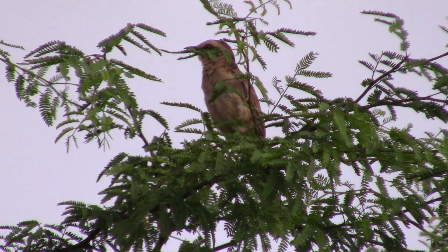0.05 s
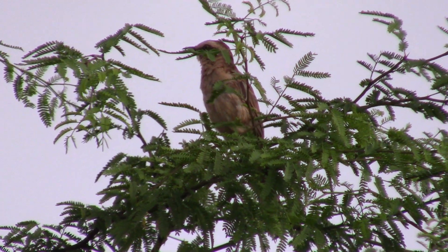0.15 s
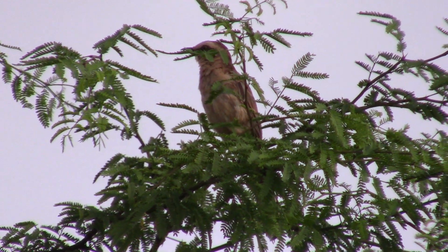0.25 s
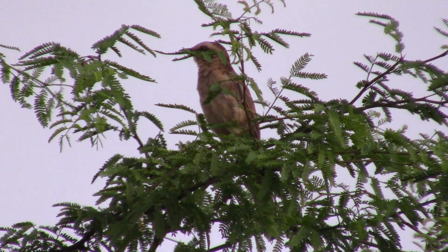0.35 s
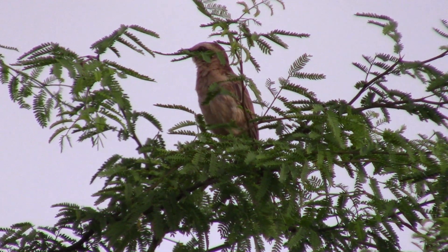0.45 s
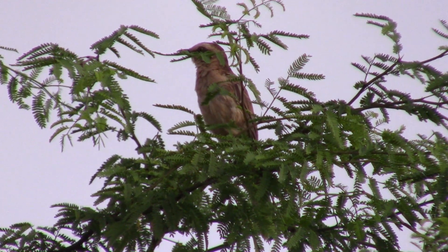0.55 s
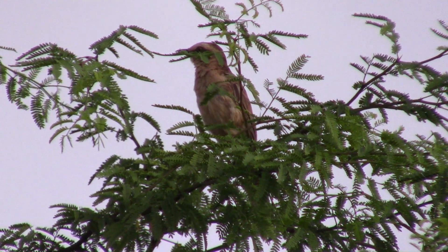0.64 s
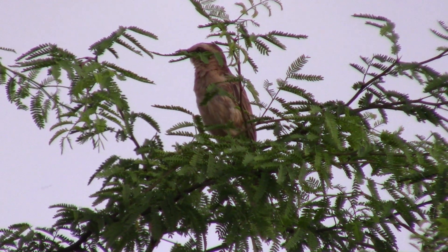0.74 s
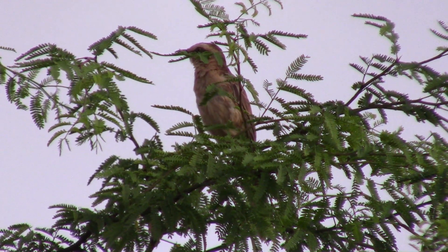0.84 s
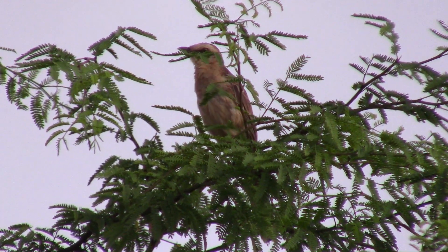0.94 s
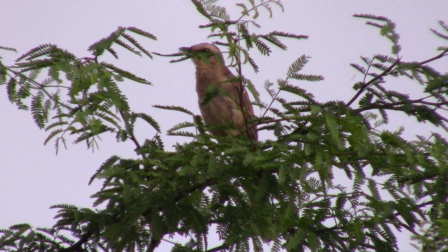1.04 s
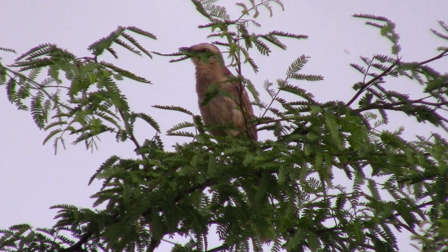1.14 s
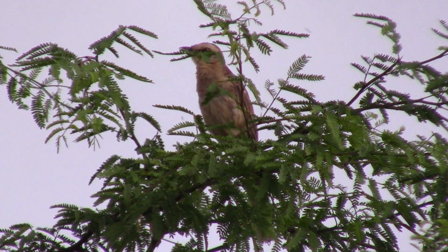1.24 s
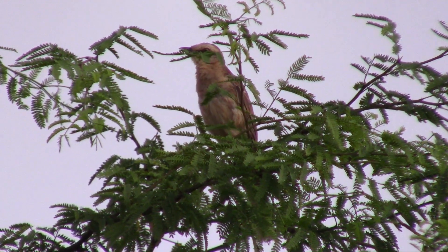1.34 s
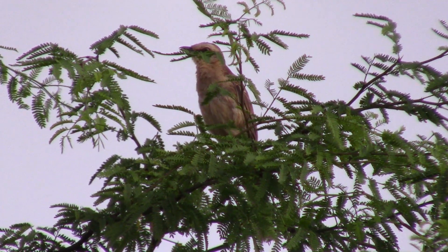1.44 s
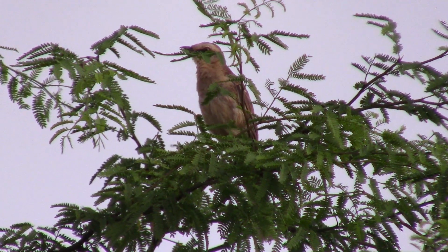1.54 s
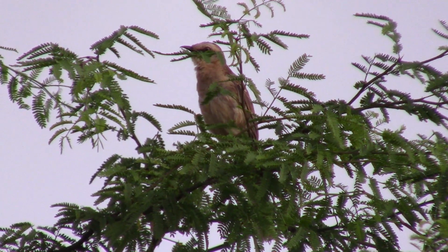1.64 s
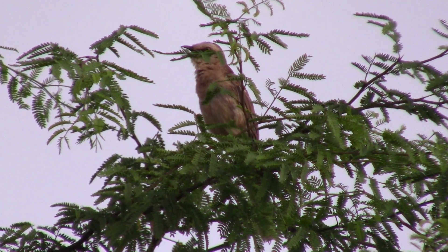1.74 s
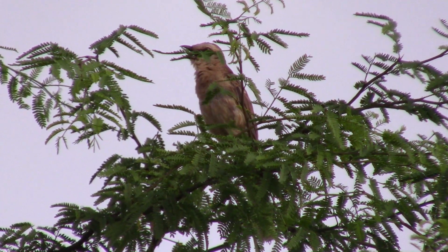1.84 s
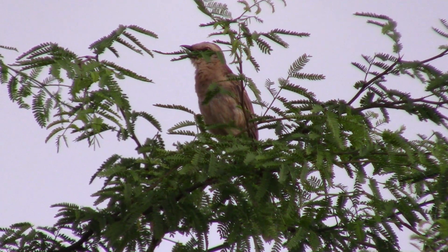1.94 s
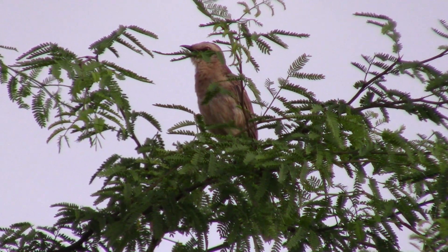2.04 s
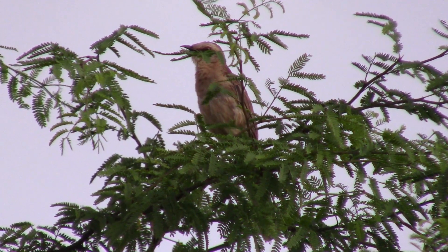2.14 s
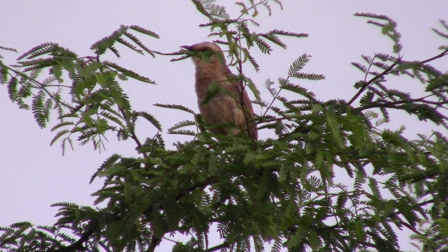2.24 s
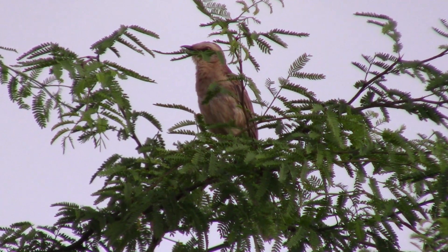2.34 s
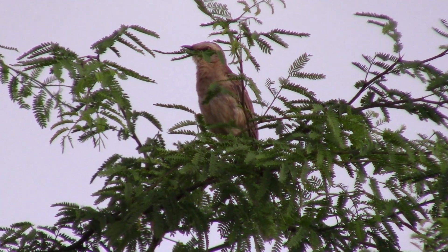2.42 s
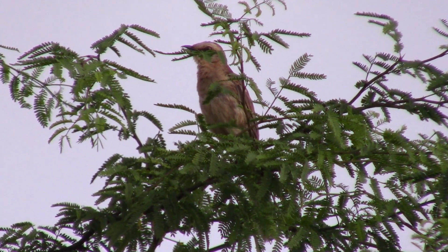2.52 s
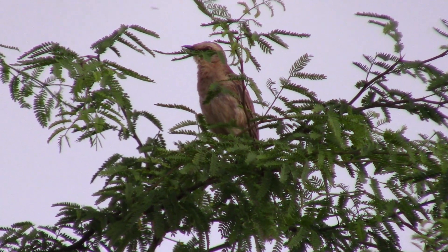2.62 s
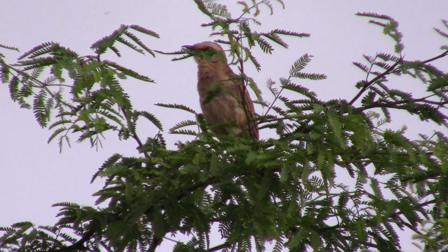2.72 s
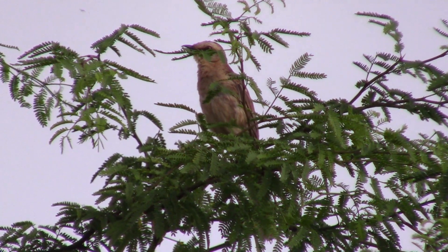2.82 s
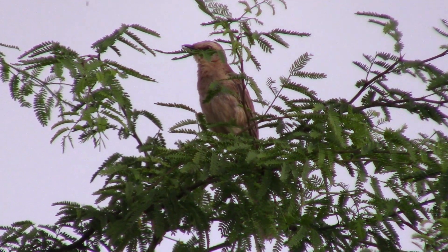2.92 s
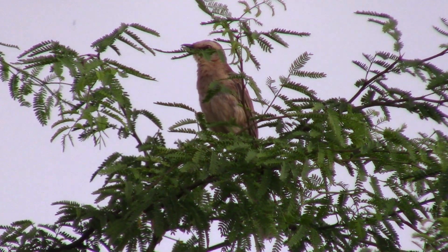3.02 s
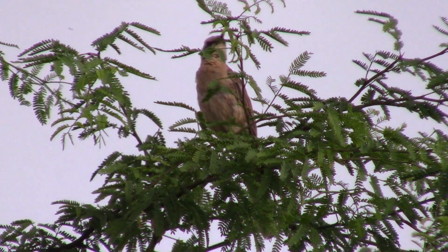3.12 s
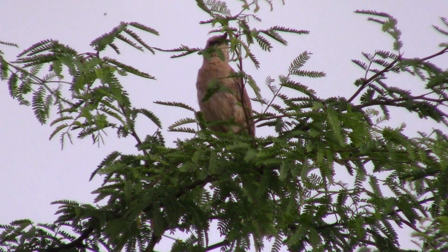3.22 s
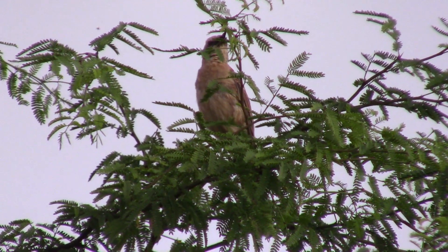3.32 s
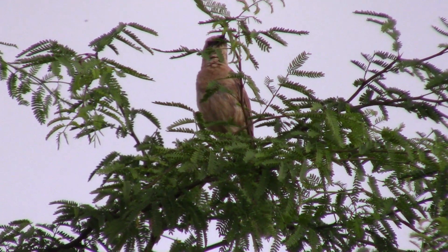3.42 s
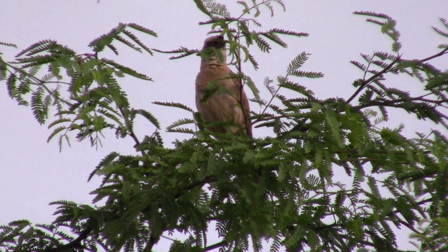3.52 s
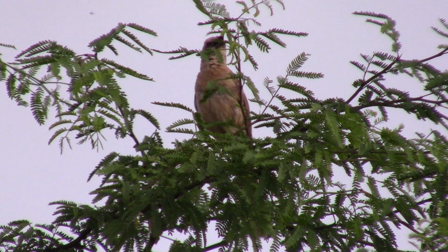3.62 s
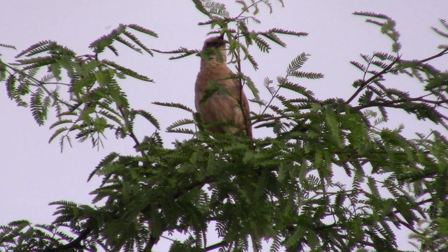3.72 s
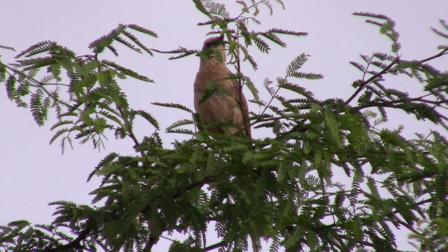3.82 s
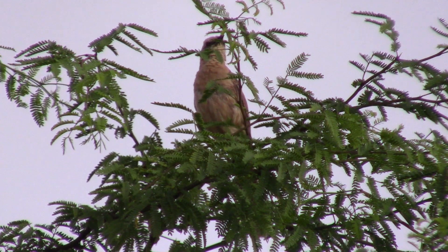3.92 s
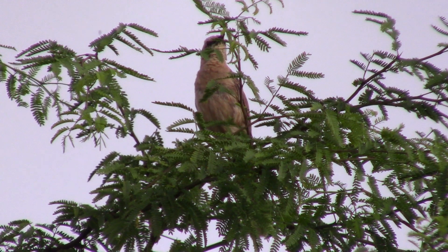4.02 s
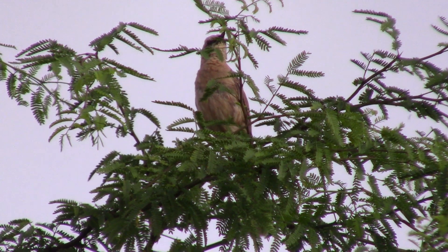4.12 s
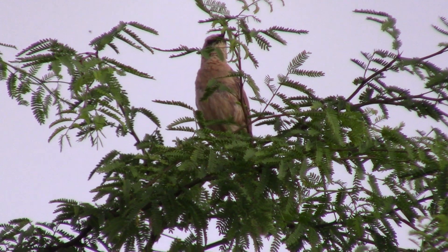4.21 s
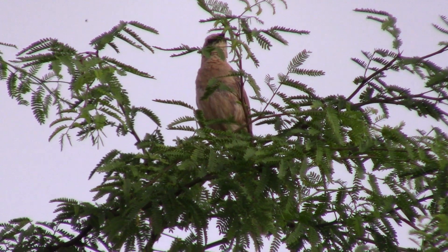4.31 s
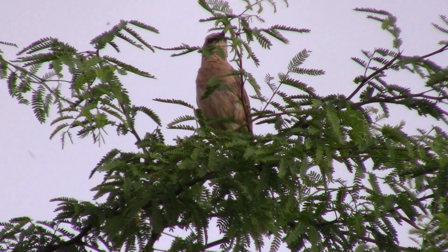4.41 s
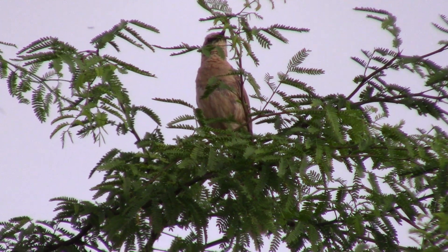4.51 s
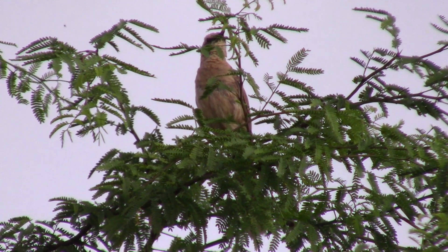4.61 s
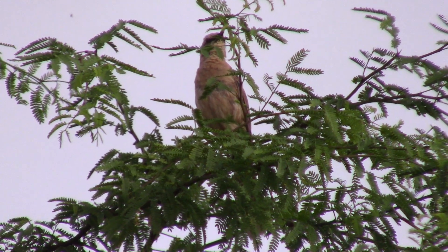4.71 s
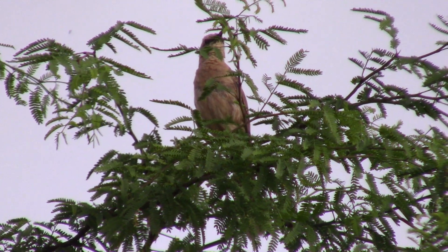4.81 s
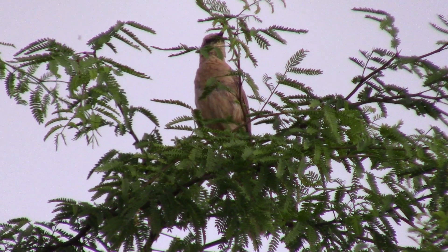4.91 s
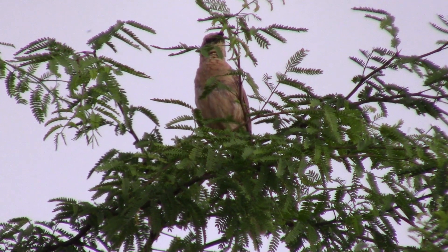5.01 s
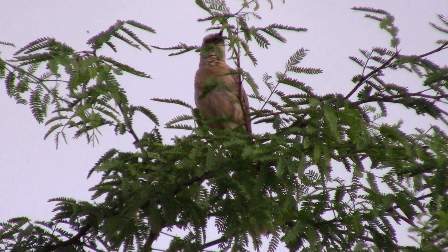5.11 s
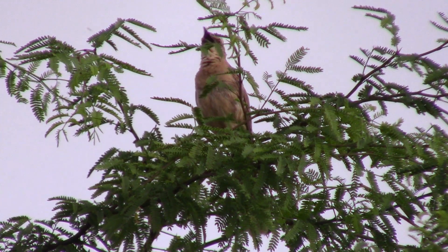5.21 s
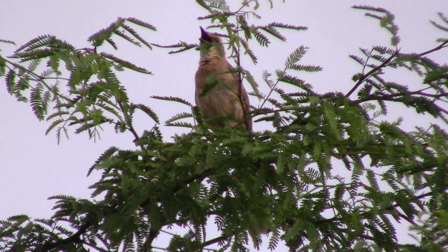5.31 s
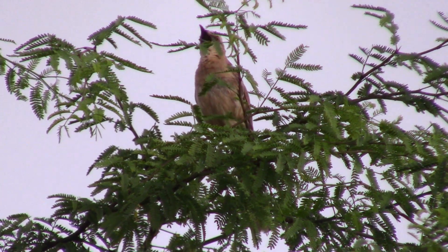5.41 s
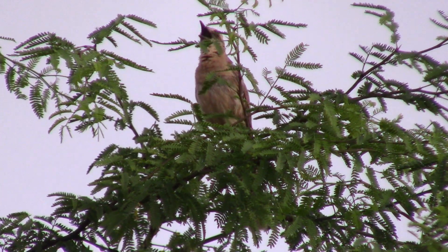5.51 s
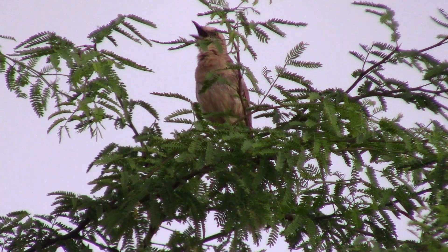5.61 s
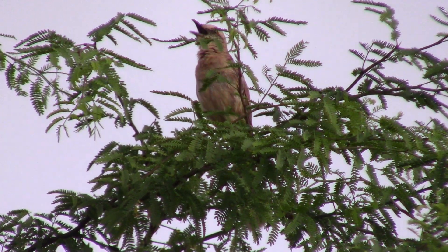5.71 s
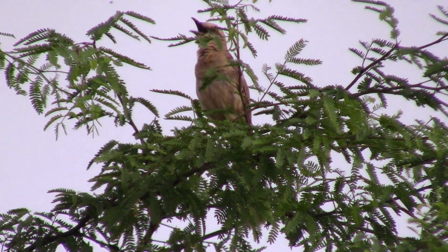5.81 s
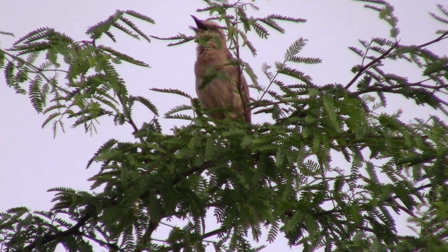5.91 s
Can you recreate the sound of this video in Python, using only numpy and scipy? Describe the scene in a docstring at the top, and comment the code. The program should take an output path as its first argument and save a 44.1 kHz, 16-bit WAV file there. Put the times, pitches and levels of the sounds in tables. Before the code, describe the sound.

A songbird sings loud two-part chip-and-buzz phrases with long pauses, then starts a fast trill, over faint distant birds and quiet open air.

```python
"""A mockingbird sings three 'chip-burr' phrases in open country, then starts a fast trill.
Its voice organ makes a stack of harmonics with sweeping pitch; its throat favours those near 2.5 kHz.
Ground, leaves and far trees answer with delayed copies. Gliding pure tones make the small birds,
a warbler, a dove and a far rooster; a cricket, a thin whine and a buzz sound over quiet air."""
import sys
import numpy as np
from scipy import signal
from scipy.fft import rfft, irfft
from scipy.io import wavfile

SR = 44100
rng = np.random.default_rng(int(sys.argv[2]) if len(sys.argv) > 2 else 0)


def inscribe(sig):
    """Save sig as 16-bit PCM at rate SR to the path in sys.argv[1].

    A 1-D sig is mono; a 2-D sig holds one channel per row.
    Samples are clipped to [-1, 1] before scaling.
    """
    pcm = np.round(np.clip(np.atleast_2d(sig).T, -1, 1) * 32767)
    wavfile.write(sys.argv[1], SR, pcm.astype(np.int16))


N = 262395
T = np.arange(N) / SR

# colour of quiet open air: (frequency [Hz], relative level [dB])
AIR_COLOUR = [(25, -24), (60, -3.5), (130, -1), (260, 1), (520, 1.5), (1000, -4), (2000, -8), (3100, -7.5),
              (3900, -4.5), (5000, -11.5), (6300, -17), (8200, -22), (11000, -25), (15500, -31.5)]
# the cricket's bouts: (start [s], end [s], level [dB])
CRICKET_BOUTS = [(-.3, 2, -69), (4.15, 6.3, -69.5)]
# a high insect buzz swells, holds and breaks off: (full from [s], until [s], level [dB], swell [dB/s])
BUZZ_SWELLS = [(3.27, 3.423, -58.5, 37), (5.3, 5.48, -61, 66)]
# dove notes: (start [s], length [s], pitch [Hz], level before the mix [dB])
DOVE_COOS = [(2.955, 0.094, 504.5, -56.5), (3.595, 0.15, 530, -52.5), (3.998, 0.12, 541.5, -53),
             (4.254, 0.087, 528, -53.5), (4.662, 0.172, 535, -52), (5.365, 0.069, 513, -55.5)]
# the far rooster's four notes: (start [s], length [s], pitch [Hz], level before the mix [dB])
ROOSTER_NOTES = [(0.524, .19, 735, -61.5), (0.757, 0.22, 715, -63), (1.003, 0.146, 692, -68),
                 (1.202, 0.23, 685, -66.5)]
# a far warbler's tumbling phrases: (start [s], length [s], first pitch [Hz], level before the mix [dB])
WARBLER_PHRASES = [(0.737, .05, 3800, -65), (1.123, .07, 4600, -56), (1.247, .015, 3889, -60),
                   (3.026, .09, 4580, -55.5), (3.991, .03, 4060, -60.5), (4.563, .065, 4428, -56)]
# a small bird's thin double 'tsee': (start [s], level [dB])
TSEE_CALLS = [(0.709, -54.5), (1.228, -66), (1.41, -55.5), (2.2, -52.5), (2.404, -64.5), (3.0, -56),
              (3.878, -56), (4.291, -64), (4.715, -56), (4.888, -65), (5.489, -71.5)]
# soft falling 'tew' calls: (start [s], start pitch [Hz], level [dB])
TEW_CALLS = [(.259, 2400, -55), (.632, 2290, -53.5), (1.019, 2615, -48.5), (4.556, 2490, -53),
             (4.831, 2950, -46.5), (5.073, 2940, -45.5)]
# level whistles of far birds: (start [s], length [s], pitch [Hz], level [dB])
LEVEL_WHISTLES = [(.97, .023, 4700, -63), (1.095, 0.036, 4470, -57), (1.3, 0.12, 3990, -62),
                  (2.279, 0.055, 3680, -63), (2.283, 0.037, 6940, -67), (2.317, 0.099, 6905, -77),
                  (2.41, .027, 7490, -71), (2.56, .02, 6950, -73), (2.933, .087, 4000, -61.5),
                  (4.811, 0.1, 4116, -63)]
# runs of thin rising twitters:
# (first [s], stop before [s], step [s], first pitch [Hz], drift [Hz/s], level [dB])
TWITTER_RUNS = [(2.012, 2.19, 0.044, 5625, 1700, -65.5), (2.35, 2.72, .055, 7400, -1300, -77),
                (2.681, 2.86, .026, 5500, 3500, -65.5), (2.805, 2.95, 0.039, 6460, 0, -68.5),
                (2.874, 3.138, 0.036, 6100, -600, -67), (3.979, 4.154, .05, 5610, 0, -68.5),
                (4.95, 5.15, .045, 5600, -500, -70)]
# how throat and beak colour the voice: (frequency [Hz], gain [dB])
THROAT_GAIN = [(500, -64), (1100, -34.5), (1500, -24), (2000, -10), (2450, 1.5), (3000, -2), (3500, -7),
               (4000, -19.5), (4450, -20.5), (5200, -30), (6100, -24), (6800, -20), (7600, -23.5),
               (8500, -22), (9400, -32.5), (10200, -31.5), (10900, -23.5), (11700, -21.5), (13000, -38),
               (14700, -33)]
# chips: (crest [s], top pitch [Hz], level before the throat [dB], swell [dB/s])
CHIP_NOTES = [(1.7850, 2673, -19.5, 400), (3.4950, 2680, -19, 578), (5.186, 2733, -19, 420)]
# burrs: (start [s], rise [s], fall [s], top pitch before vibrato [Hz], level before the throat [dB],
#         time of one vibrato crest [s], vibrato rate at that crest [Hz], depth [share of pitch])
BURR_NOTES = [(1.816, 0.058, 0.091, 2594, -20.5, 1.8752, 112.4, 0.092),
              (3.529, .071, 0.076, 2392, -20, 3.65, 115.7, 0.07),
              (5.215, .057, .100, 2396, -20, 5.2728, 114.2, 0.079)]
# trill notes, each a peak of pitch and a sagging tail; the peaks narrow as the trill gets going:
# (crest [s], top pitch [Hz], rise [s], fall [s], tail pitch [Hz], attack [s],
#  level before the throat [dB], tail level relative to the peak [dB])
TRILL_NOTES = [(5.601, 2808, .0215, .0122, 2320, 0.039, -14.9, -7.5),
               (5.6381, 2900, 0.006, 0.011, 2123, 0.006, -17.5, -4),
               (5.6758, 3113, 0.004, 0.0065, 2120, .004, -18.5, -2.5),
               (5.717, 3093, .0038, .0042, 1997, 0.0056, -17.5, -5),
               (5.758, 3113, 0.00328, .0052, 1816, 0.0069, -17, -7.5),
               (5.8014, 3150, .0035, 0.0047, 1770, 0.0067, -18.5, -6),
               (5.8435, 3160, .0035, .0052, 1822, 0.0081, -20, -4.5),
               (5.886, 3120, 0.0029, .0052, 1880, 0.0062, -18.5, -4.7),
               (5.9275, 3180, .0035, .0052, 1963, 0.0071, -19.5, -4.2)]

AIR_DB = -58.5
CRICKET_FADE_S = 0.24
BUZZ_RELEASE_DB_PER_S, BUZZ_REST_DB = 194, -80.5
# the warbler's strokes alternate high and low while the phrase sinks and fades
STROKE_GAP_S, LOW_STROKE_RATIO, WARBLE_SINK_PER_S, WARBLE_FADE_DB_PER_S = .018, .84, 2.266, 72
GROUND_LAG_S = .00433
TOP_HZ = 15700
# how unevenly slack labia (the vibrating lips of the voice organ) beat, as a share of pitch
CLEAR_RASP, BURR_RASP = .025, .06
# how much a chip's pitch trembles, as a share of pitch
CHIP_JITTER = .018
# a chip climbs to a knee, flicks up to its top and drops away
CHIP_KNEE_HZ, CHIP_CLIMB_S, CHIP_FLICK_S, CHIP_DROP_S = 1742, 0.036, .004, .0175
CHIP_LEAD_S, CHIP_TAIL_S, CHIP_FADE_DB_PER_S = .035, 0.022, 1000
# a burr climbs steeply from a low foot to a gently peaked roof and drops back, softer towards both ends
BURR_FOOT_HZ, BURR_STEEPNESS, BURR_ROOF_SAG, BURR_START_DB, BURR_END_DB = 761, 4.4, 0.26, -9, -14.5
# a trill note starts at the foot, TRILL_LEAD rise times before its crest,
# and fades in over TRILL_ONSET rise times
TRILL_FOOT_HZ, TRILL_LEAD, TRILL_ONSET = 1334, 1.75, 0.18
# it also swells from a soft start, and lets go at the end of its tail
TRILL_START_DB = -17.5
TRILL_SAG_PER_S, TRILL_TAIL_S, TRILL_RELEASE_S = 17, 0.035, 0.017


def undb(db):
    """Turn decibels into a gain."""
    return 10 ** (np.asarray(db) / 20)


def unit(x):
    """Scale to an average strength (rms) of 1."""
    return x / np.sqrt(np.mean(x ** 2))


def add(out, start, x):
    """Mix x into out from a start time on."""
    i = max(int(round(start * SR)), 0)
    out[i:i + len(x)] += x[:max(len(out) - i, 0)]


def walk(rate, size):
    """Smooth random wander around 0: random points, rate of them per second, joined by lines."""
    position = np.arange(size) * rate / SR
    count = int(position[-1]) + 2
    return np.interp(position, np.arange(count), rng.standard_normal(count))


def gain_at(points, hz):
    """Read gains from a (frequency, dB) table, with even steps per octave."""
    f, db = np.transpose(points)
    return undb(np.interp(np.log(np.maximum(hz, 1)), np.log(f), db))


def band_noise(hz, width_hz, size):
    """Noise in a bell-shaped band, rms 1."""
    f = np.fft.rfftfreq(size, 1 / SR)
    bell = np.exp(-.5 * ((f - hz) / width_hz) ** 2)
    return unit(irfft(rfft(rng.standard_normal(size)) * bell, size))


def gesture(start, end, edge_s=.001):
    """The times of one note, and a gate that softens its two ends."""
    t = np.arange(start, end, 1 / SR)
    return t, np.clip(np.minimum(t - t[0], t[-1] - t) / edge_s, 0, 1)


def whistle(length, pitches, db, waver=0.0045, skew=1):
    """A pure note gliding through evenly spaced pitches, swelling and fading; skew < 1 quickens the attack."""
    u = np.linspace(0, 1, int(length * SR))
    glide = np.interp(u, np.linspace(0, 1, len(pitches)), pitches)
    hz = glide * (1 + waver * walk(291.7, len(u)))
    swell = np.sin(np.pi * u ** skew)
    return np.sqrt(2) * undb(db) * swell * np.sin(2 * np.pi * np.cumsum(hz) / SR)


def air(side_db=-9, chorus_db=-72):
    """Quiet open air as shaped noise, wider in the bass, with the blur of very distant birds."""
    f = np.fft.rfftfreq(N, 1 / SR)
    mid, side = rfft(rng.standard_normal((2, N))) * gain_at(AIR_COLOUR, f)
    side = irfft(side * undb(side_db) / np.sqrt(1 + f / 5000), N)
    mid = irfft(mid, N)
    bed = (mid + np.array([side, -side])) / np.std(mid) * undb(AIR_DB + .5 * walk(2.65, N))
    chorus = band_noise(3600, 600, N) * undb(chorus_db + 2.5 * walk(14, N))
    # a faint tone comes and goes in the distance, and dies away
    tone_db = -73 + 4 * walk(9, N) - 8 * np.maximum(T - 2.6, 0)
    tone = band_noise(1190, 35, N) * undb(tone_db)
    # one soft puff of breeze rumbles
    puff = band_noise(65, 32, N) * undb(-67) * np.exp(-((T - 4.69) / 0.072) ** 2)
    return bed + chorus + tone + puff


def insects():
    """A pulsing tone for the cricket, narrow noise for a thin steady whine, wide noise for a swelling buzz."""
    pulses = 1 + .7 * np.sin(2 * np.pi * 27 * T + .6 * walk(8, N))
    wing_hz = 4215 + 30 * walk(250, N)
    wing = np.sqrt(2) * np.sin(2 * np.pi * np.cumsum(wing_hz) / SR)
    bouts = np.zeros(N)
    for start, end, db in CRICKET_BOUTS:
        bouts += undb(db) * np.clip(np.minimum(T - start, end - T) / CRICKET_FADE_S, 0, 1)
    whine = undb(-88) * band_noise(8450, 70, N)
    buzz = unit(band_noise(5330, 540, N) + 1.5 * band_noise(4850, 1360, N))
    swells = np.zeros(N)
    for full, until, db, swell in BUZZ_SWELLS:
        before_db = swell * np.maximum(full - T, 0)
        after_db = BUZZ_RELEASE_DB_PER_S * np.maximum(T - until, 0)
        swells += undb(db - before_db - after_db)
    # between swells the buzz rests at a faint level
    buzz = buzz * np.maximum(swells, undb(BUZZ_REST_DB)) * undb(1.3 * walk(60, N))
    return wing * pulses * bouts + whine + buzz


def warbler(upstroke_db=-3):
    """Scratchy phrases of falling strokes, each led in by a quick rise."""
    out = np.zeros(N)
    for start, length, first_hz, first_db in WARBLER_PHRASES:
        for k, age in enumerate(np.arange(0, length, STROKE_GAP_S)):
            hz = first_hz * np.exp(-WARBLE_SINK_PER_S * age) * (LOW_STROKE_RATIO if k % 2 else 1)
            db = first_db - WARBLE_FADE_DB_PER_S * age
            s = start + age + .002 * rng.standard_normal()
            add(out, s - .018, whistle(.022, [hz * .8, hz], db + upstroke_db, waver=.02))
            add(out, s, whistle(.026, [hz, hz * .88, hz * .76], db, waver=.02))
    return out


def far_birds(coo_octave_db=-16, crow_octave_db=-13):
    """The warbler, plus dove and rooster notes: wavering arched tones with a weaker tone about an octave up."""
    out = warbler()
    arch = np.array([.91, 1, 1.01, .98])
    for s, length, hz, db in DOVE_COOS:
        add(out, s, whistle(length, hz * arch, db, waver=.025))
        add(out, s, whistle(length, 1.85 * hz * arch, db + coo_octave_db, waver=0.079))
    for s, length, hz, db in ROOSTER_NOTES:
        add(out, s, whistle(length, hz * arch, db, waver=.035))
        add(out, s, whistle(length, 2 * hz * arch, db + crow_octave_db, waver=0.03))
    return out


def small_birds(tsee_gap=.055):
    """Thin calls from around, each a short gliding or level pure tone."""
    out = np.zeros(N)
    for s, db in TSEE_CALLS:
        for start in (s, s + tsee_gap):
            add(out, start, whistle(0.028, [5450, 5410, 5264, 4970], db))
    for s, hz, db in TEW_CALLS:
        add(out, s, whistle(.025, [hz, hz * .96, hz * .87, hz * .75], db, skew=.45))
    for first, last, step, hz, drift, db in TWITTER_RUNS:
        for s in np.arange(first, last, step):
            middle_hz = (hz + drift * (s - first)) * (1 + .01 * rng.standard_normal())
            add(out, s, whistle(0.0214, middle_hz * np.array([.95, 1, 1.03]), db))
    for s, length, hz, db in LEVEL_WHISTLES:
        add(out, s, whistle(length, [hz, hz], db))
    return out


def scatter(t60, rise, top_hz, spread, size=2 * SR):
    """Left and right response of many small echoes that build up, then fall 60 dB in about t60 seconds."""
    t = np.arange(size) / SR
    dull = signal.butter(2, min(top_hz, SR / 2 - 1000), fs=SR, output="sos")
    envelope = (1 - np.exp(-t / rise)) * np.exp(-np.log(1000) * t / t60)
    mid, side = signal.sosfilt(dull, rng.standard_normal((2, size))) * envelope
    return (mid + spread * np.array([side, -side])) / np.sqrt(np.sum(mid ** 2))


def grove(t60=3, top_hz=2900, size=SR // 2, count=40):
    """Left and right response of separate far trees, each returning one dull copy."""
    lag, crown, side = rng.random((count, 3)).T
    lag = (np.arange(count) + lag) / count * (size - 1)
    strength = (.5 + crown) * np.exp(-np.log(1000) * lag / SR / t60)
    balance = 1 + np.array([side - .5, .5 - side])
    response = np.zeros((2, size))
    response[:, lag.astype(int)] = strength * balance / np.sqrt(np.sum(strength ** 2))
    return signal.sosfilt(signal.butter(4, top_hz, fs=SR, output="sos"), response)


def echo(x, response):
    """Pass a sound through a two-channel response."""
    return signal.fftconvolve(x[None], response, axes=1)[:, :N]


def syrinx(hz, push, rasp, tilt=.9, even_db=-6, jitter=0.042, hiss_db=-26, count=20):
    """Harmonics of vibrating labia: taut ones favour odd harmonics, slack ones beat unevenly; air hisses past."""
    # low pitch means slack labia
    slack = np.clip(2 - hz / 1200, 0, 1)
    shaky_hz = hz * (1 + (jitter + rasp * slack ** 2) * walk(1200, len(hz)))
    phase = 2 * np.pi * np.cumsum(shaky_hz) / SR
    even = undb(even_db * (0.5 - slack))
    stack = np.zeros(len(hz))
    for k in range(1, count + 1):
        audible = k * hz < SR / 2  # leave out what is too high for the sample rate
        stack += np.sin(k * phase) / k ** tilt * audible * (1 if k % 2 else even)
    uneven = 1 + 5 * rasp * slack * walk(900, len(hz))
    hiss = undb(hiss_db) * rng.standard_normal(len(hz))
    return push * (np.sqrt(2) * stack * uneven + hiss)


def throat(x, size=2048):
    """The throat's resonance, which never sounds ahead of its input: harmonics crossing it stand out."""
    # folding the cepstrum turns the gains into a minimum-phase filter
    cepstrum = irfft(np.log(gain_at(THROAT_GAIN, np.fft.rfftfreq(size, 1 / SR))))
    cepstrum[1:size // 2] *= 2
    cepstrum[size // 2 + 1:] = 0
    return signal.fftconvolve(x, irfft(np.exp(rfft(cepstrum))))[:len(x)]


def chip(top_hz, db, swell_db_per_s):
    """A quick upsweep that flicks over its crest and collapses; loudest at the crest."""
    t, gate = gesture(-CHIP_LEAD_S, CHIP_TAIL_S, edge_s=.006)
    slope = CHIP_KNEE_HZ * np.exp(np.where(t < 0, t / CHIP_CLIMB_S, -t / CHIP_DROP_S))
    hz = slope + (top_hz - slope) * np.exp(-(t / CHIP_FLICK_S) ** 2)
    push = gate * undb(db + np.where(t < 0, swell_db_per_s * t, -CHIP_FADE_DB_PER_S * t))
    return syrinx(hz, push, CLEAR_RASP, tilt=1.21, jitter=CHIP_JITTER)


def burr(start, rise, fall, top_hz, db, crest, rate_hz, depth,
         slowing_hz_per_s=250, throb_db=2.0, loosening=1.0, lean=.06):
    """An arched note whose fast vibrato slows down, swings wider at low pitch and lifts the level on each crest."""
    t, gate = gesture(start, start + rise + fall)
    # u runs from -1 at the start through 0 at the top to 1 at the end
    u = (t - start - rise) / np.where(t < start + rise, rise, fall)
    roof = 1 - BURR_ROOF_SAG * np.abs(u)
    arch = roof * (1 - np.abs(u) ** BURR_STEEPNESS)
    hz = BURR_FOOT_HZ + (top_hz - BURR_FOOT_HZ) * arch
    push = gate * undb(db + np.where(u < 0, BURR_START_DB, BURR_END_DB) * u ** 2)
    turn = 2 * np.pi * (rate_hz * (t - crest) - slowing_hz_per_s * (t - crest) ** 2 / 2)
    # each swing jumps up and slides down, and its width varies by chance
    swing = np.cos(turn) - lean * np.sin(2 * turn)
    width = np.minimum(depth * (hz.max() / hz) ** loosening, .25)
    width = width * (1.1 + .2 * walk(110, len(t)))
    throb = undb(throb_db * (np.cos(turn) - 0.86))
    return syrinx(hz * (1 + width * swing), push * throb, BURR_RASP,
                  tilt=0.86, even_db=-2.5, jitter=0.0083, hiss_db=-14)


def syllable(top_hz, rise, fall, tail_hz, attack, db, tail_db, shoulder=2.6):
    """One note of the trill: the pitch leaps to a peak, then falls onto a softer tail that sags."""
    t, gate = gesture(-TRILL_LEAD * rise, TRILL_TAIL_S, edge_s=TRILL_ONSET * rise)
    peak = np.exp(-np.where(t < 0, np.abs(t / rise) ** shoulder, (t / fall) ** 2))
    low = np.where(t < 0, TRILL_FOOT_HZ, tail_hz * np.exp(-TRILL_SAG_PER_S * t))
    swell_db = TRILL_START_DB * np.maximum(1 - (t - t[0]) / attack, 0)
    release = np.minimum((t[-1] - t) / TRILL_RELEASE_S, 1)
    push = gate * release * undb(db + swell_db + tail_db * (1 - peak) * (t > 0))
    return syrinx(low + (top_hz - low) * peak, push, CLEAR_RASP,
                  tilt=0.69, even_db=-6, jitter=0.023, hiss_db=-22)


def mockingbird():
    """Chips, burrs and the trill, all made by the same kind of voice organ and sent through one throat."""
    out = np.zeros(N)
    for crest, *shape in CHIP_NOTES:
        add(out, crest - CHIP_LEAD_S, chip(*shape))
    for start, *shape in BURR_NOTES:
        add(out, start, burr(start, *shape))
    for crest, top_hz, rise, *shape in TRILL_NOTES:
        add(out, crest - TRILL_LEAD * rise, syllable(top_hz, rise, *shape))
    return throat(out)


def scene(ground_db=-10, leaves_db=-17, left_minus_right_db=-1.0):
    """The singer with its ground bounce and echoes, among the other voices of the countryside."""
    song = mockingbird()
    bounce = np.interp(T - GROUND_LAG_S, T, song)
    leaves = echo(song, scatter(0.19, 0.00062, 4800, 0.15))
    near = song + undb(ground_db) * bounce + undb(leaves_db) * leaves
    trees = undb(-28.5) * echo(song, grove())
    balance = undb(np.array([[left_minus_right_db], [-left_minus_right_db]]) / 2)
    # the far trees still ring with an earlier phrase: a band of noise that fades
    ringing = band_noise(2700, 153, N) * undb(-56.5 - 29 * T)
    small, far = small_birds(), far_birds()
    others = small + undb(-12.5) * echo(small, scatter(0.28, 0.0024, 12000, 1.0))
    others = others + undb(2.5) * far + undb(-2.5) * echo(far, scatter(0.75, 0.00077, 12300, 0.17))
    return (near + trees) * balance + others + ringing + insects() + air()


def record(dry):
    """A steep low-pass filter cuts the top of the treble."""
    return signal.sosfilt(signal.ellip(10, .1, 80, TOP_HZ, fs=SR, output="sos"), dry)


dry = scene()
out = record(dry)
inscribe(out)
```